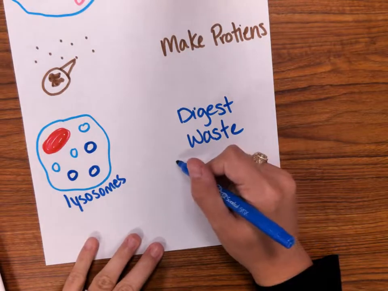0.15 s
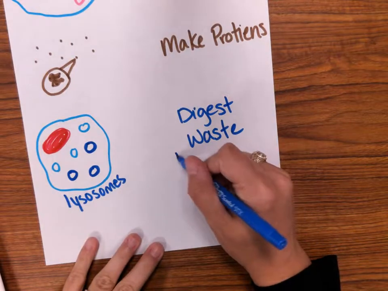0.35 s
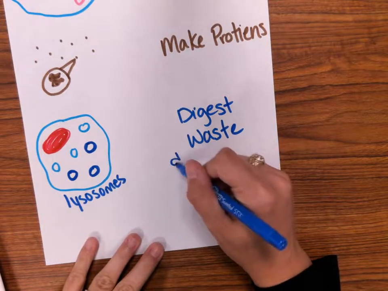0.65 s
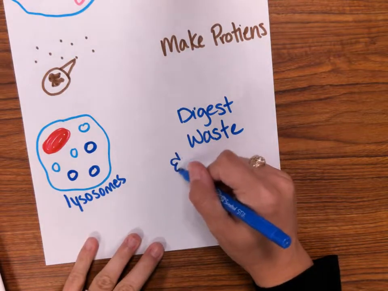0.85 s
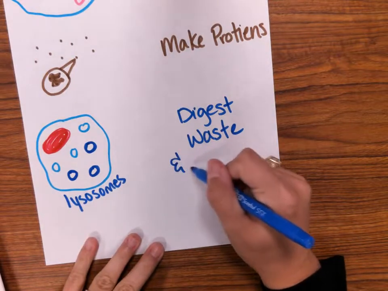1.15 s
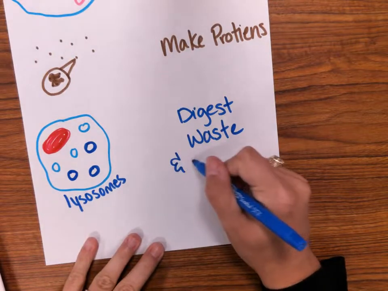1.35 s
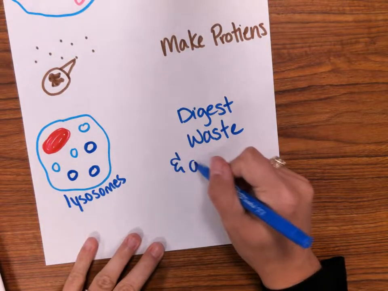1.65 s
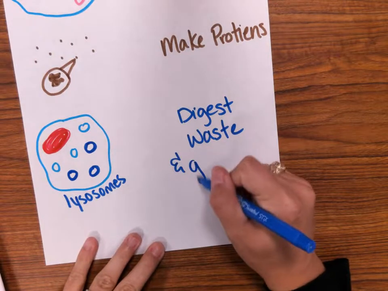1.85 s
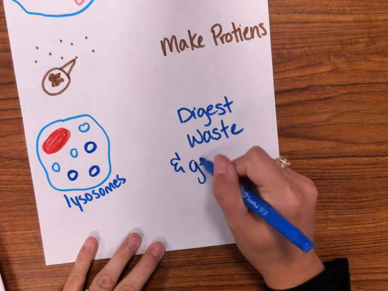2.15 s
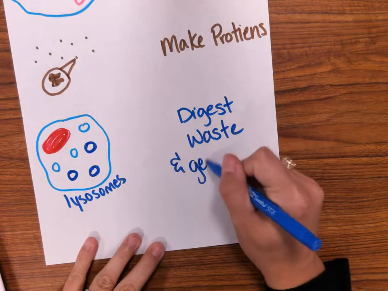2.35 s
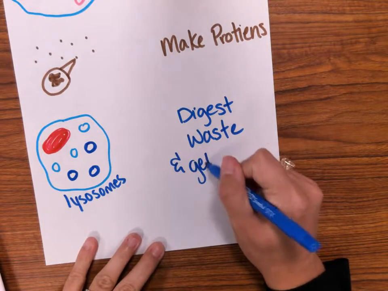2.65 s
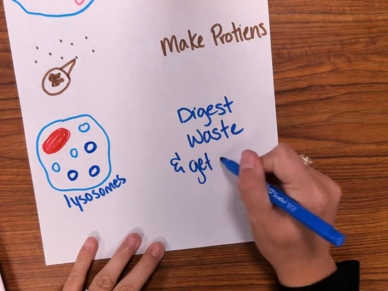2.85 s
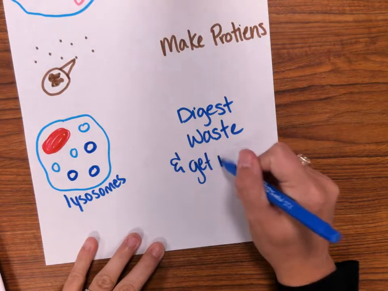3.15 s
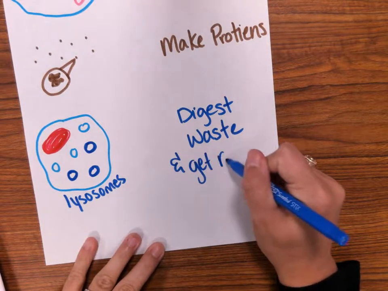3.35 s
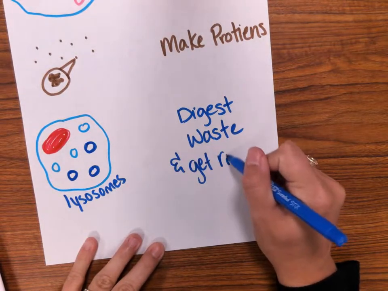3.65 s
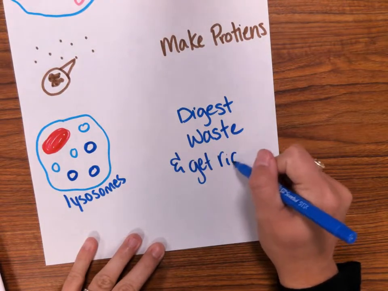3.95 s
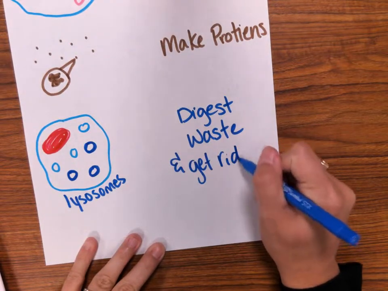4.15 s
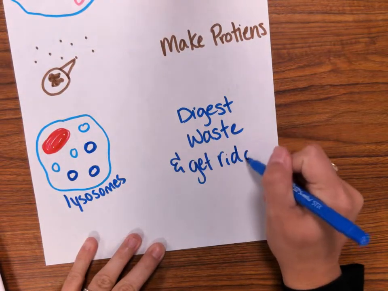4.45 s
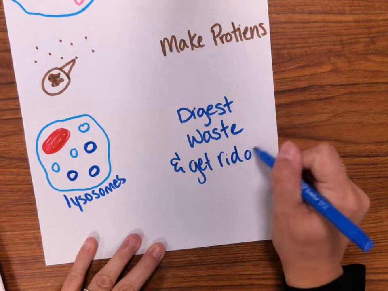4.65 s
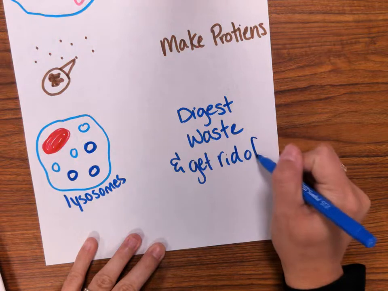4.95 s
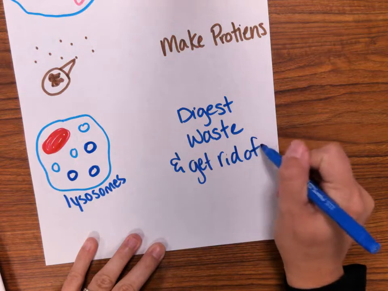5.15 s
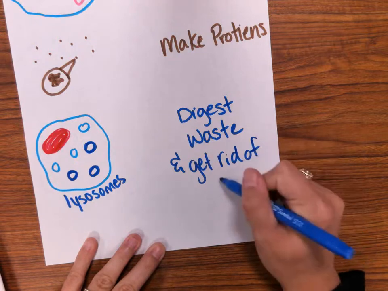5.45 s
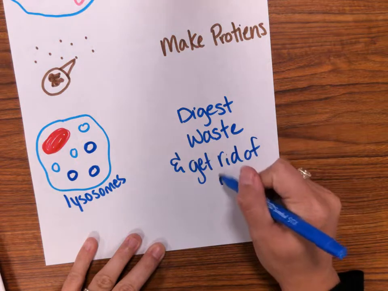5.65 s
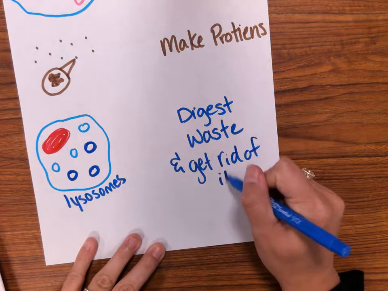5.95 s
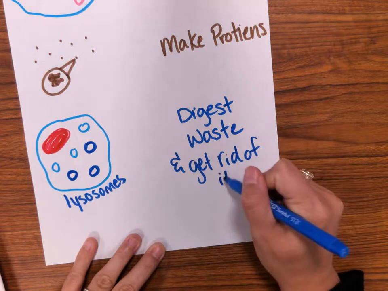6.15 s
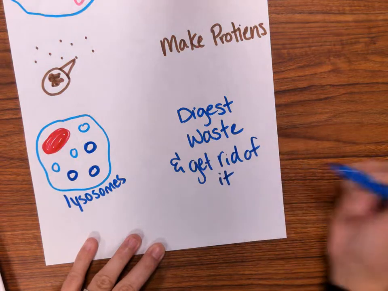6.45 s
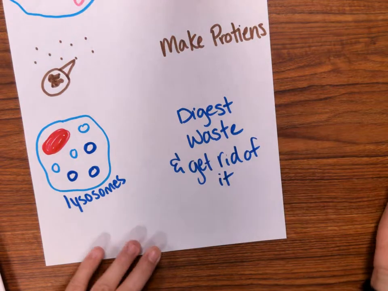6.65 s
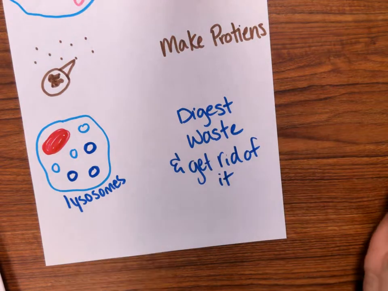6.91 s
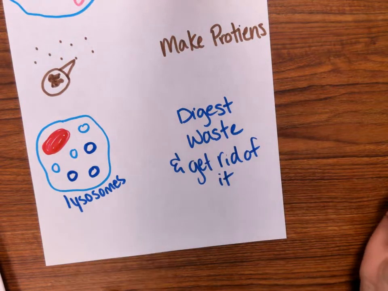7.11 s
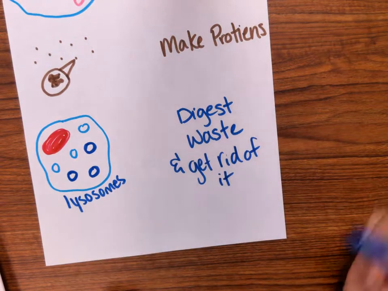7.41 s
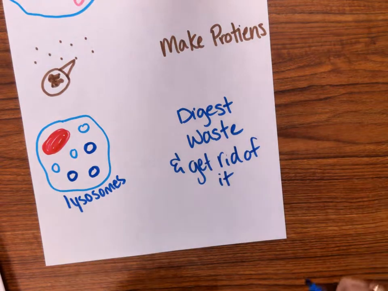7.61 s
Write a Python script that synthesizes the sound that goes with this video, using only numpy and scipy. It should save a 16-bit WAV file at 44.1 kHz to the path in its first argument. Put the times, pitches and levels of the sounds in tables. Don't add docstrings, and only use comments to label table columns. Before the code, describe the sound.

Close phone pickup at a wooden table. Deep duct rumble holds throughout under faint hiss. Brief hissy marker strokes scratch across paper in groups with small pauses, some ringing thinly, and a soft wrist thud comes near the end of the writing. A hand then slides off the paper, one hard plastic knock resounds through the table and room, and light brushing with a sharp tick closes it.

```python
import sys
import numpy as np
from scipy import signal
from scipy.fft import rfft, irfft, dct
from scipy.io import wavfile
from scipy.ndimage import uniform_filter1d, minimum_filter1d

SR = 44100
rng = np.random.default_rng(int(sys.argv[2]) if len(sys.argv) > 2 else 0)


def level_to_linear(level):
    exponent = np.asarray(level, float) / 20
    return 10 ** exponent


def store_pcm(level_fs):
    pcm = np.round(np.clip(level_fs, -1, 1) * 32767).astype(np.int16)
    wavfile.write(sys.argv[1], SR, np.atleast_2d(pcm).T)


N = 342877
TAP_S = 6.9955
BLOCK, SHORT_BLOCK, GRID = 2048, 256, 1914
EDGE_HZ = 7260


def evened(x):
    return x / np.sqrt(np.mean(x ** 2) + 1e-20)


def noise():
    return rng.standard_normal(N)


def smooth_noise(samples):
    return evened(uniform_filter1d(uniform_filter1d(noise(), samples), samples))


def read(points, hz):
    f, value = np.transpose(points)
    return np.interp(np.log(hz + 1), np.log(f + 1), value)


def add(mix, s, sound):
    part = mix[round(s * SR):][:len(sound)]
    part += sound[:len(part)]


def coloured(x, points):
    hz = np.fft.rfftfreq(len(x), 1 / SR)
    return irfft(rfft(x) * level_to_linear(read(points, hz)), len(x))


def resonant(x, peaks):
    hz = np.fft.rfftfreq(len(x), 1 / SR)
    shape = sum(level_to_linear(db) / (1 + 2j * (hz - f) / width) for f, width, db in peaks)
    return irfft(rfft(x) * shape, len(x))


def ring(modes, rise_s):
    t = np.arange(SR // 2) / SR
    sines = sum(level_to_linear(db - 60 * t / t60) * np.sin(2 * np.pi * hz * t) for hz, db, t60 in modes)
    return -sines * (1 - np.exp(-t / rise_s))


def room(x):
    # (frequency [Hz], t60 [s])
    band_decay = [(250, 0.2), (600, 0.19), (1000, .36), (1500, 0.4), (2400, 0.11), (2800, 0.095),
                  (6000, .12)]
    hz, t, z = signal.stft(rng.standard_normal(SR // 2), SR, nperseg=256)
    decay = level_to_linear(-60 * t / read(band_decay, hz)[:, None])
    tail = signal.istft(z * decay, SR, nperseg=256)[1]
    tail[:120] = 0
    return signal.fftconvolve(x, tail / np.linalg.norm(tail))[:N]


def ventilation():
    # (frequency [Hz], level [dB per Hz])
    air_spectrum = [(2.4, -35), (4.0, 4), (16, 2.5), (31, -6.5), (62, -9), (85, -18.5), (130, -24),
                    (157, -20), (224, -28.5), (265, -29.5), (348, -41), (467, -36.5), (600, -45.5),
                    (780, -73.5), (1320, -120)]
    # (frequency [Hz], width [Hz], level [dB])
    duct_modes = [(39.5, 6.3, 2), (60.1, 10, 0.5), (106.7, 20, -12), (251, 10, -20.5)]
    swell = smooth_noise(9000)
    low = level_to_linear(-26.5 + .5 * swell) * evened(coloured(noise(), air_spectrum))
    ducts = resonant(resonant(noise(), duct_modes), [(151.3, 400, 0)])
    return low + level_to_linear(-38.5) * evened(ducts)


def hiss():
    # (frequency [Hz], level [dB per Hz])
    hiss_spectrum = [(450, -31.5), (650, 1.5), (900, -2.5), (1400, -7), (2000, -8.5), (3900, -10),
                     (5000, -9.5), (7000, -8.5), (9000, -7.5)]
    return level_to_linear(-53.0) * evened(coloured(noise(), hiss_spectrum))


def bells(middles, lengths, level_db):
    lean = .9
    power = np.zeros(N)
    for middle, length, db in zip(middles, lengths, level_db):
        progress = np.arange(0, length, 1 / SR) / length
        swell = np.sin(np.pi * progress ** lean) ** 3.0
        add(power, middle - length / 2, level_to_linear(2 * db) * swell)
    return np.sqrt(power)


def drag_slips():
    happens = rng.random(N) < 14000 / SR
    slips = rng.choice([-1., 1.], N) * level_to_linear(2.0 * rng.exponential(1, N)) * happens
    return slips * level_to_linear(0.66 * smooth_noise(150))


def marker_and_hand():
    # (middle [s], length [s], speed [dB], nib ring [dB], extra pressure [dB])
    pen_strokes = [
        (0.433, 0.121, -56.5, 2, 0),
        (0.563, 0.098, -54.5, -3.5, 1),
        (0.631, 0.177, -48, -7.5, -1),
        (0.727, 0.093, -50.5, -3, -0.5),
        (0.823, 0.037, -47, -7, -3.5),
        (0.844, 0.084, -48.5, -4, -0.5),
        (0.943, 0.11, -48, -4, 1),
        (1.025, 0.086, -51.5, -5.5, -0.5),
        (1.235, 0.27, -59, -4, -0.5),
        (1.351, 0.32, -66, -10, -0.5),
                   (1.505, 0.18, -48.5, -4.5, 0), (1.629, 0.127, -44.5, -1.5, 0), (1.774, 0.18, -50, -2, 0),
                  (1.859, 0.087, -44.5, -5.5, 0), (1.911, 0.089, -47, -6.5, 0.0092),
                  (2.192, 0.14, -49.5, -6.5, 0), (2.315, 0.131, -49, -1, 0.0055),
                  (2.391, 0.071, -49, -4, 0), (2.578, 0.15, -51, 0.5, 0),
                  (2.808, 0.091, -55.5, -5.5, 0.0067), (2.896, 0.178, -56, -4.5, 0),
                   (3.11, 0.117, -56, 3.5, 0),
        (3.242, 0.13, -49, 1, 0),
        (3.524, 0.121, -57.5, -1.5, 0),
        (3.806, 0.154, -63, -3, 0),
        (3.945, 0.153, -48.5, 0, 0.003),
        (4.037, 0.036, -44.5, -2.5, 0),
        (4.06, 0.137, -50, 2, 2),
        (4.117, 0.041, -46.5, -1.5, 0),
        (4.201, 0.065, -48.5, 4, 0),
        (4.236, 0.24, -53, -9, 0.0077),
                   (4.468, 0.16, -54.5, 0.5, 0.5), (4.56, 0.092, -48.5, -3.5, -0.5), (4.58, 0.2, -55, -7, 0),
                  (4.74, 0.08, -60.5, -2.5, -1), (4.833, 0.081, -50, -10.5, -3),
                  (4.921, 0.17, -52.5, 4, 3.5), (5.171, 0.063, -46.5, -0.5, 3.5),
                  (5.155, 0.023, -44.5, -7, -1), (5.337, 0.205, -50, -11.5, 0.5),
                  (5.592, 0.033, -46.5, -2, 2), (5.612, 0.067, -57, -5.5, 0),
                  (6.015, 0.12, -46.5, -5, -2.5), (6.275, 0.08, -43, -4.5, 0)]
    # (middle [s], length [s], speed [dB], weight on the sheet [dB])
    slides = [
        (6.38, .3, -63, -3.5),
        (6.491, .283, -47.5, -5),
        (6.618, .32, -47.5, -4),
        (6.929, .25, -59, -6.5),
        (7.149, .4, -63, -0.5),
        (7.352, 0.32, -61.5, 2),
        (7.461, 0.049, -43, -1),
        (7.514, .09, -47, 1.5),
        (7.588, .27, -48, -5),
        (7.755, 0.23, -52.5, 1.5),
    ]
    # (frequency [Hz], level [dB per Hz])
    fibre_spectrum = [(4200, -28.5), (5000, -22.5), (6000, -7.5), (7000, -2.5), (9000, -8.5)]
    # (frequency [Hz], width [Hz], level [dB])
    nib_modes = [(5010, 410, 2), (4384, 390, -7.5), (5450, 410, -6.5)]
    # (frequency [Hz], width [Hz], level [dB])
    sheet_modes = [(894, 530, -4.5), (1253, 660, -1), (1958, 46, 5), (2341, 670, 3.5), (3230, 860, 0),
                   (3970, 1200, -7)]

    slips = drag_slips()
    fibres = evened(coloured(slips, fibre_spectrum))
    nib = evened(resonant(slips, nib_modes))
    sheet = evened(resonant(slips, sheet_modes))

    pen = np.array(pen_strokes)
    hand = np.array(slides)
    middles, lengths, speed_db = np.vstack([pen[:, :3], hand[:, :3]]).T
    nib_db = np.r_[pen[:, 2] + pen[:, 3], hand[:, 2] - 9]
    pen_sheet_db = -55 + 0.49 * (pen[:, 2] + 50.5) + pen[:, 4]
    sheet_db = np.r_[pen_sheet_db, hand[:, 2] + hand[:, 3]]
    return (level_to_linear(7.0) * fibres * bells(middles, lengths, speed_db)
            + level_to_linear(-1.1) * nib * bells(middles, lengths, nib_db)
            + sheet * bells(middles, lengths, sheet_db))


def ticks():
    # (time [s], peak [dB], pitch [Hz], t60 [s])
    tick_events = [(0.814, -38, 6610, 0.008), (5.148, -36, 5940, 0.008), (6.9953, -34, 6570, 0.0087),
                   (4.0318, -30.5, 4950, 0.008), (4.119, -31.5, 7180, 0.0082), (5.5934, -41, 5900, 0.0079),
                   (6.6214, -27, 6730, 0.0085), (7.2063, -40, 1796, 0.005), (7.2897, -40, 2310, 0.016),
                   (7.3712, -33.5, 1790, 0.0018), (7.4438, -11.5, 6190, 0.0058), (7.4441, -22, 7020, 0.008),
                   (7.4534, -28.5, 6060, 0.0047), (7.5144, -30.5, 2280, 0.01)]
    # (time [s], level [dB], pitch [Hz], t60 [s])
    thud_events = [
        (5.555, -27.5, 416, .025),
    ]
    out = np.zeros(N)
    for s, db, hz, t60 in tick_events:
        modes = [(hz, db, max(t60, .002)), (hz * 0.47, db - 12, .006), (hz * .8, db - 4, .006)]
        add(out, s, ring(modes, 0.00033))
    for s, db, hz, t60 in thud_events:
        add(out, s, ring([(hz, db, t60)], 0.002))
    return out


def tap():
    # (frequency [Hz], level [dB], t60 [s])
    cap_modes = [(902, 0.5, 0.017), (970, -5, 0.0147), (1142, -5.5, 0.022), (454, -13, 0.048),
                 (690, -8.5, 0.0067), (335, -39.5, 0.047), (1367, -7.5, 0.011), (1984, -13.5, 0.033),
                 (2165, -12.5, 0.024), (2260, -17.5, 0.016), (2794, -17, 0.012), (3400, -16, 0.012),
                 (3946, -16.5, 0.0077), (4600, -28, 0.013)]
    # (frequency [Hz], level [dB], t60 [s])
    table_modes = [(61.2, -5.5, 0.16), (120.7, -8, 0.071), (279, -24.5, 0.099)]
    out = np.zeros(N)
    add(out, TAP_S, ring(cap_modes, .0005))
    add(out, TAP_S + .0036, ring(table_modes, .001))
    return level_to_linear(-1) * out


def tap_echo():
    # (frequency [Hz], level [dB per Hz])
    echo_spectrum = [(200, -2), (500, -2), (900, -1.5), (1400, -8), (2400, -2.5), (2900, -23.5),
                     (6000, -20.5)]
    blow = np.zeros(N)
    blow[round(TAP_S * SR)] = 1
    blow = coloured(blow, echo_spectrum)
    return level_to_linear(-3.0) * room(blow / np.linalg.norm(blow))


def scene():
    small = ticks()
    background = ventilation() + hiss()
    knocks = tap() + tap_echo() + small + level_to_linear(-7.5) * room(small)
    return (background + marker_and_hand() + knocks)[None]


def attacks(x):
    power = uniform_filter1d(np.diff(x, prepend=0) ** 2, size=128)
    before = np.roll(uniform_filter1d(power, size=1024), 640)
    calm = 1. * (power < level_to_linear(25.) * before)
    near = 1 - minimum_filter1d(calm, size=900)
    return uniform_filter1d(near, size=256)


def thrifty(x, size, over_db, busy_db):
    # (frequency [Hz], step [dB])
    step_floor = [(30, -27.5), (230, -31.5), (430, -34), (650, -44.5), (900, -45), (1500, -44.5),
                  (3500, -47.5), (7000, -48)]
    padded = np.pad(x, (2 * BLOCK - GRID, 2 * BLOCK + (GRID - N) % BLOCK))
    window = np.sin(np.pi * (np.arange(2 * size) + .5) / (2 * size))
    frames = np.lib.stride_tricks.sliding_window_view(padded, 2 * size)[::size] * window
    a, b, c, d = np.split(frames, 4, axis=1)
    folded = np.hstack([-c[:, ::-1] - d, a - b[:, ::-1]])
    lines = dct(folded, type=4, norm="ortho")

    hz = (np.arange(size) + .5) * SR / (2 * size)
    band = uniform_filter1d(lines ** 2, size=size // 64, axis=1) * np.clip(hz / 900, 0, 1) ** 2
    busy = (lines[:, hz > 600] ** 2).sum(1, keepdims=True) / size
    luck = np.repeat(rng.standard_normal((len(lines), 128)), size // 128, axis=1)
    step_power = level_to_linear(2 * read(step_floor, hz)) + level_to_linear(2 * over_db) * band + level_to_linear(2 * busy_db) * busy
    step = np.sqrt(step_power) * level_to_linear(2.5 * luck)
    rounded = np.sign(lines) * np.floor(abs(lines) / step + 0.5) * step
    lines = (rounded + level_to_linear(-24) * (lines - rounded)) * (hz < EDGE_HZ)

    p, q = np.split(dct(lines, type=4, norm="ortho"), 2, axis=1)
    frames = np.hstack([q, -q[:, ::-1], -p[:, ::-1], -p]) * window
    overlapped = frames[1:, :size] + frames[:-1, size:]
    return overlapped.ravel()[2 * BLOCK - GRID - size:][:N]


def low_pass(x):
    return signal.sosfilt(signal.butter(12, 11400, fs=SR, output="sos"), x)


def record(dry):
    t = np.arange(N) / SR
    hz = np.fft.rfftfreq(N, 1 / SR)
    fade_in = 1 - np.exp(-(t + .0001) / 0.00036)
    x = 0.85 * np.tanh(dry[0] / 0.87) * fade_in
    quick = attacks(x)
    thinned = thrifty(x * (1 - quick), BLOCK, 3.0, 3.0) + thrifty(x * quick, SHORT_BLOCK, -1.3, -14.5)
    shelf = irfft(rfft(x) * level_to_linear(-29.5) * (hz > EDGE_HZ) * (hz < 7720), N)
    folded = rfft(thinned * np.cos(2 * np.pi * 17280 * t))
    mirror = irfft(folded * level_to_linear(-41) * (hz > 10000) * (hz < 11400), N)
    return low_pass((thinned + shelf + mirror)[None])


dry = scene()
out = record(dry)
store_pcm(out)
```